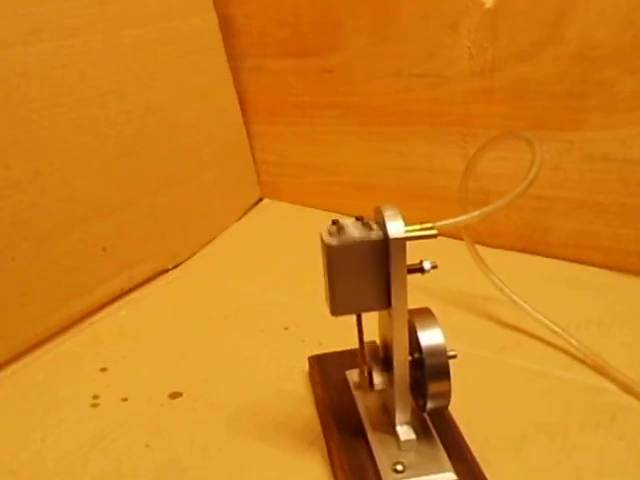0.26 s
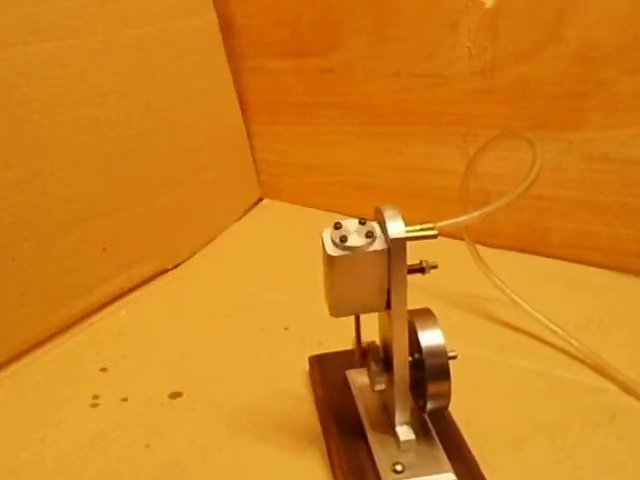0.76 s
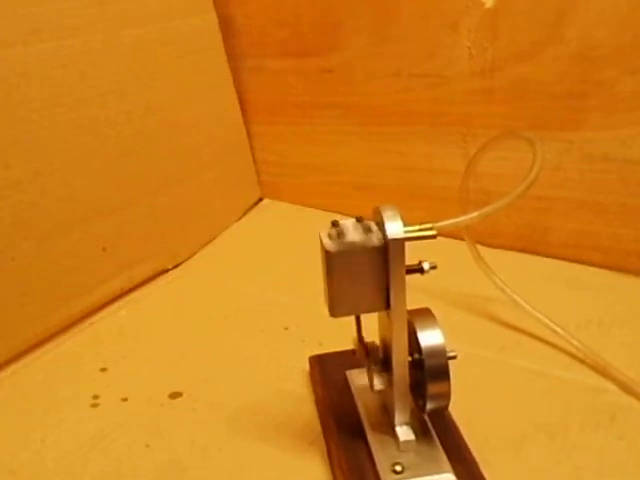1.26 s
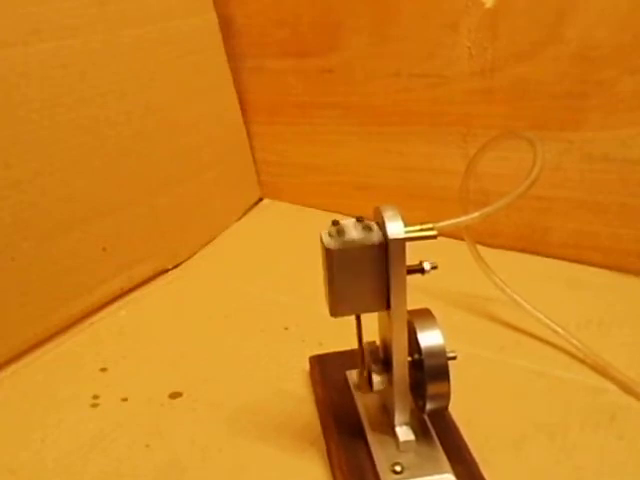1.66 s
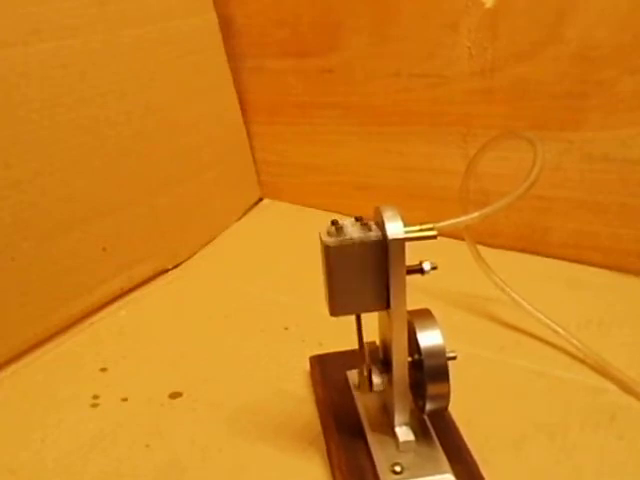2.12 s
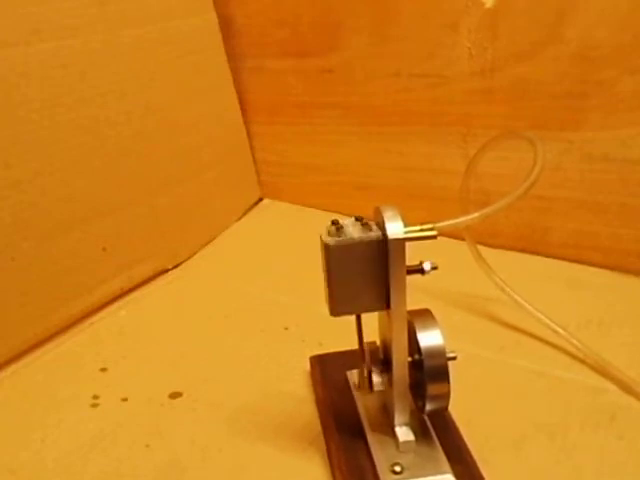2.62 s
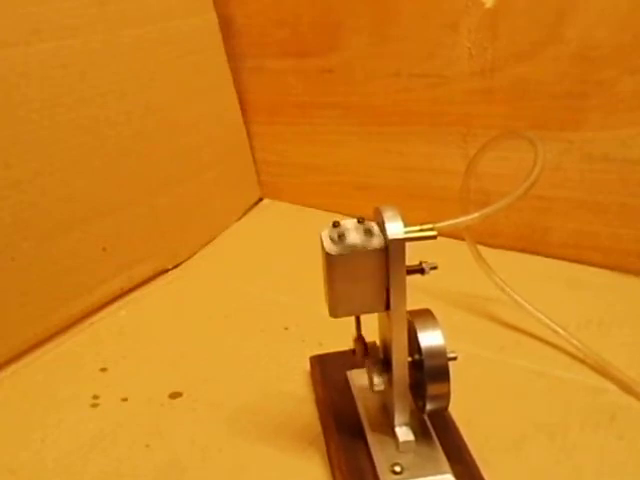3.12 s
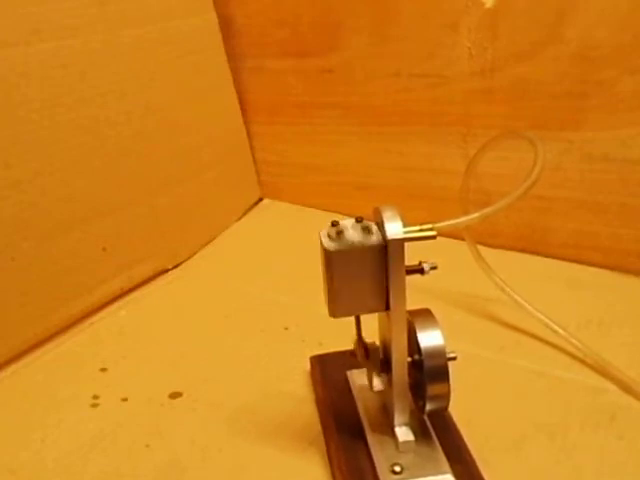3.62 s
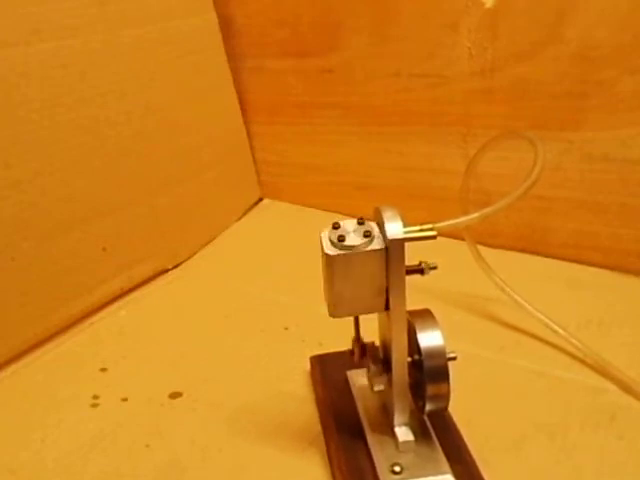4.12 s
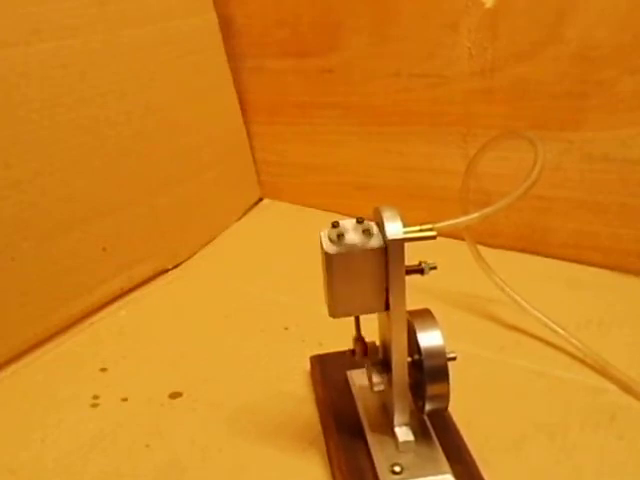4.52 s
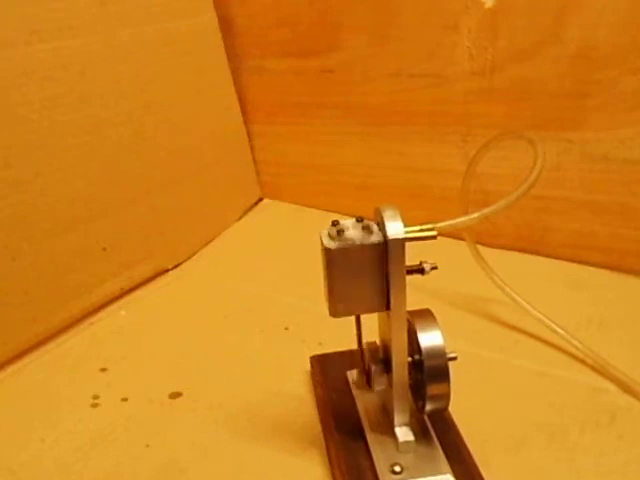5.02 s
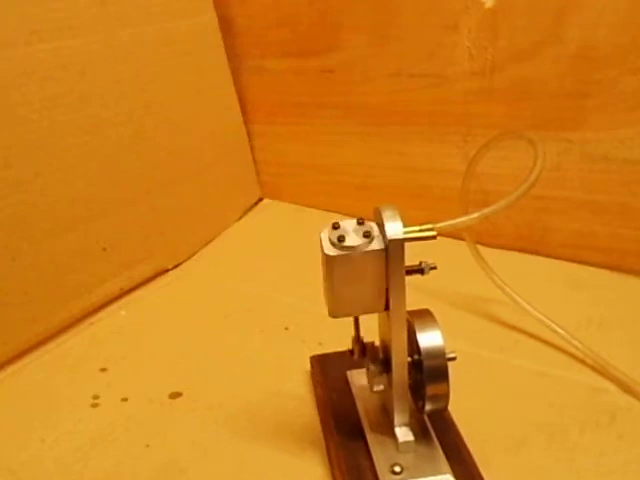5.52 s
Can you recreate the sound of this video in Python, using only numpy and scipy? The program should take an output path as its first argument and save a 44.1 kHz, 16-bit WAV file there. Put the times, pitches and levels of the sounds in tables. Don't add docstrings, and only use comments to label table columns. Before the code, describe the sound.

Rapid, dry metallic clatter mixed with sharp spitting air comes from a little engine in a cardboard corner. The beat is fast and slightly uneven at first, then gradually stretches from around 2.4 seconds and settles slower by about four, still running at the end. Snap, knock and exhaust hiss become easier to tell apart. A close microphone gives a crunchy, bright, distorted edge, with a faint rumble beneath and little room.

```python
import sys
import numpy as np
from scipy import signal
from scipy.fft import rfft, irfft
from scipy.io import wavfile
from scipy.ndimage import uniform_filter1d

SR = 44100
rng = np.random.default_rng(int(sys.argv[2]) if len(sys.argv) > 2 else 0)


def volts(x):
    e = np.asarray(x, float) / 20
    return 10 ** e


def output_pcm(signal):
    pcm = np.clip(np.atleast_2d(signal).T, -1, 1) * 32767
    wavfile.write(sys.argv[1], SR, np.round(pcm).astype(np.int16))


N = 254456

# hz, level_db (per Hz)
SCRAPE_HIGH = [(3000, -3), (4500, 7.5), (7000, -4)]
INLET_OPEN, EXHAUST_OPEN, EXHAUST_SHUT = 0.3, 0.62, 0.95


def turns():
    # snap_s, looseness_db,
    # return_after_ms, return_db, exhaust_after_ms
    turn_rows = [(-.0599, 2, 55, -23, 80.6), (0.051, -2, 55, -7, 84), (0.163, -9, 57, -8, 84),
                 (.2781, -6, 54, -12, 82), (0.3919, 7, 51, -10, 79), (0.505, -18, 48, -22, 82),
                 (0.627, -3, 54, -14, 80), (.739, -5, 56, -11, 82), (0.8548, -.5, 65, -6, 88),
                 (0.9735, -6, 55, -25, 87), (1.0892, -5, 64, -22, 85), (1.2127, -7, 54, -14, 80),
                 (1.3235, 1, 63, -11, 89), (1.444, -10, 60, -1.5, 83), (1.5633, -15, 49, -37, 79.6),
                 (1.682, -11, 55, -4, 83), (1.7996, -9, 60.4, -3.5, 85), (1.9195, 3, 58, -6, 84),
                 (2.0388, 4, 61, -6, 89.5), (2.1607, -8, 60.6, -6, 83), (2.2782, -3, 57, -3, 89),
                 (2.4074, 1, 60, -10, 95.5), (2.5395, -2, 67.5, -2, 94), (2.6684, 3, 72, -2, 93),
                     (2.802, 3, 80, -34, 105), (2.938, 5, 90, -6, 114), (3.0874, -5, 96, -8.5, 123),
                     (3.2484, -9, 101, -6.5, 120), (3.411, -10, 106, -6.5, 136),
                     (3.584, -5, 111.5, -1, 134), (3.7581, -2, 114, -3.5, 137), (3.938, -8, 116.4, -8, 147),
                     (4.1261, -1.5, 119.6, -6.5, 145), (4.311, -13, 128, -5, 146),
                     (4.506, -5, 123, -11, 145), (4.7028, -7, 125.4, -11, 147.4),
                     (4.9004, -3, 127, -7.5, 147), (5.1006, -9, 125.6, -7, 148),
                     (5.2981, -3, 123.6, -10, 151), (5.5006, 5, 130, -9, 150), (5.708, -17, 128, -18, 120),
                     (5.9178, 0, 128, -9, 149)]
    fast_s, slow_s = 0.095, 0.19
    all_turns = np.array(turn_rows)
    snap, loose_db, back_ms, back_db, exhaust_ms = np.transpose(all_turns)
    slow = np.clip((np.gradient(snap) - fast_s) / (slow_s - fast_s), 0, 1)
    return snap, snap + back_ms / 1000, snap + exhaust_ms / 1000, loose_db, back_db, slow


def crank():
    # fast_db, slow_db
    floors = [
        (-22.5, -32),
        (-23.5, -25),
        (-36.5, -24.5),
    ]
    # fast_db, slow_db, hold_ms, tail_ms
    after_snap = [
        (-11, -13.5, 6.3, 21.6),
        (-9, -23.5, 11.5, 18),
        (-11.5, -26.5, 11.6, 23),
    ]
    # fast_db, slow_db, hold_ms, tail_ms
    after_exhaust = [
        (-15.5, -25.5, 5.1, 8.2),
        (-17.5, -31.5, 30.7, 7.5),
        (-10.5, -32, 42.8, 4.6),
    ]
    opens_early_ms = 8.5
    shut_ms, shut_width_ms, shut_fast_db, shut_slow_db = 14, 3.3, -15, 0

    snap, _, exhaust, loose_db, _, slow = turns()
    t = np.arange(N) / SR
    turn, angle = np.divmod(np.interp(t, snap, np.arange(len(snap))), 1)
    turn = turn.astype(int)
    slow = np.interp(t, snap, slow)

    to_exhaust_ms = 1000 * (t - exhaust[turn])
    since_snap_ms = 1000 * (t - snap[turn])
    opens = exhaust - opens_early_ms / 1000
    last_open = np.maximum(np.searchsorted(opens, t) - 1, 0)
    since_exhaust_ms = 1000 * np.abs(t - opens[last_open])

    beds = []
    for floor, *swells in zip(floors, after_snap, after_exhaust):
        bed = volts(floor[0] + slow * (floor[1] - floor[0]))
        for (fast_db, slow_db, hold_ms, tail_ms), ms in zip(swells, (since_snap_ms, since_exhaust_ms)):
            decay = np.exp(-np.maximum(ms - hold_ms, 0) / tail_ms)
            bed = bed + volts(fast_db + slow * (slow_db - fast_db)) * decay
        beds.append(uniform_filter1d(bed, size=200))
    rattle, hiss, jet = beds

    shut_db = shut_fast_db + slow * (shut_slow_db - shut_fast_db)
    shut = volts(shut_db * np.exp(-((to_exhaust_ms + shut_ms) / shut_width_ms) ** 2))
    rattle = rattle * volts(0.41 * loose_db[turn] * np.sin(np.pi * angle) ** 2)
    return angle, rattle * shut ** 0.35, hiss * shut, jet * shut


def every_turn(times, slow, fast_row, slow_row):
    scatter_db, scatter_ms = 2.0, 0.6
    rows = np.array(fast_row) + np.outer(slow, np.subtract(slow_row, fast_row))
    chance = rng.standard_normal((len(times), 3))
    delay_ms = rows[:, 0] + scatter_ms * chance[:, 0] * (rows[:, 0] != 0)
    rows[:, 0] = times + delay_ms / 1000
    rows[:, 1] += scatter_db * chance[:, 1]
    rows[:, 2] *= volts(0.62 * chance[:, 2])
    return rows


def heard(rows):
    rows = np.vstack(rows)
    return rows[(rows[:, 0] > 0.008) & (rows[:, 0] < N / SR - 0.008)]


def knocks():
    # delay_ms, level_db, length_ms, mode_hz
    pin_knock = [(8, -6, 7.6, 2620), (13, -9, 9.6, 2600)]
    # delay_ms, level_db, length_ms, mode_hz
    blow_knock = [(11, -6.5, 7.2, 1440), (12, -30, 4.9, 1400)]
    # delay_ms, level_db, length_ms, mode_hz
    take_up = [(-10.5, -28, 1.4, 1400), (-12.5, -22.5, 1.6, 1430)]
    # start_s, level_db, length_ms, mode_hz
    strays = [(.2746, -13, 4.1, 1920), (0.1766, -5, 3.3, 1180), (.4935, -3.5, 5.2, 1100),
              (.616, -8, 3.9, 1810), (0.8516, -17, 7.7, 1770), (1.203, -14, 2.4, 1890),
              (1.532, -8, 13, 2270), (1.56, -12, 11, 1580), (1.9164, -13, 6, 1920), (1.992, -8, 7.7, 2230),
              (2.4824, -13, 1.8, 1140), (2.5317, -15, 3.9, 2220), (3.0672, -16, 2.5, 1130),
              (3.215, -7, 5.2, 3100), (3.976, -19, 15, 1250), (4.5271, -14, 2, 1930),
              (5.4337, -10, 2.6, 3030), (5.747, -10.5, 2.1, 3060)]
    return_ms, return_fast_hz, return_slow_hz = 4.6, 1410, 1860

    snap, back, exhaust, _, back_db, slow = turns()
    return_hz = return_fast_hz + slow * (return_slow_hz - return_fast_hz)
    returns = np.transpose([back, back_db, 0 * back + return_ms, return_hz])
    rows = heard([every_turn(snap, slow, *pin_knock), every_turn(exhaust, slow, *blow_knock),
                  every_turn(snap, slow, *take_up), returns, strays])
    rows[:, 3] *= volts(1.0 * rng.standard_normal(len(rows)))
    return rows


def frame(rattle, angle):
    # mode_hz, width_hz, level_db
    modes = [(1141.6, 61, -3.5), (1347, 232, -1), (1841, 184, 0), (2232, 100, -4), (3030, 110, -2),
             (3480, 1150, 1.5), (4493, 340, -1), (5470, 810, -4)]
    # hz, level_db (per Hz)
    scrape_low = [(300, -17), (900, -8.5), (1550, -4.5), (2700, -2)]
    slack_from_s = 4.4

    hz = np.array(modes)[:, 0]
    drive = np.tile(rattle * volts(-13.0) * flutter(34.5, depth_db=4.0), (len(hz), 1))
    drive[0] *= volts(0.5)
    rows = knocks()
    chance_db = 1.2 * rng.standard_normal((len(rows), len(hz)))
    for (s, db, ms, near_hz), own_db in zip(rows, chance_db):
        favour_db = 6 * np.exp(-(np.log(hz / near_hz) / 0.22) ** 2)
        returning = angle[round(s * SR)] > INLET_OPEN
        if returning:
            favour_db -= 7 * (hz > 2600)
        if returning and s > slack_from_s:
            add(drive, s - 0.007, 6.0, volts(db - 16 + favour_db + own_db), rise_ms=1.6, tail_ms=1.0)
        add(drive, s - 0.001, 0.65 * ms, volts(db - 11.0 + favour_db + own_db), rise_ms=0.47, tail_ms=3.24)

    contacts = [grains(8000, spread_db=2.5), grains(8000, spread_db=3.0)]
    rings = np.zeros(N)
    for k, (mode_hz, width_hz, db) in enumerate(modes):
        rings += volts(db) * resonate(drive[k] * contacts[k % 2], mode_hz, width_hz)
    rings += volts(-6.0) * drive[hz < 3400].mean(axis=0) * filtered_noise(scrape_low)
    grit = filtered_noise(SCRAPE_HIGH, grains(5000, spread_db=-3.0))
    return rings + volts(-2.3) * drive[hz > 3400].mean(axis=0) * grit


def bursts():
    # delay_ms, level_db, length_ms
    face_snap = [(0, -4, 6.6), (0, -5.5, 2)]
    # delay_ms, level_db, length_ms
    pin_snap = [(9, -14.5, 3.7), (12, -7, 4.2)]
    # delay_ms, level_db, length_ms
    rebound = [(32.3, -21, 2.7), (39.1, -5, 0.96)]
    # delay_ms, level_db, length_ms
    return_spit = [(0, -8.5, 5.6), (0, -28, 4.6)]
    # delay_ms, level_db, length_ms
    crack_open = [(-5, -34, 3.5), (-15.5, -15, 4.2)]
    # delay_ms, level_db, length_ms
    exhaust_puff = [(0, 0, 5.9), (0, -7, 13.7)]

    snap, back, exhaust, _, back_db, slow = turns()
    spit = every_turn(back, slow, *return_spit)
    spit[:, 1] += 0.41 * (back_db + 11)
    return heard([every_turn(snap, slow, *face_snap), every_turn(snap, slow, *pin_snap),
                  every_turn(snap, slow, *rebound), spit,
                  every_turn(exhaust, slow, *crack_open), every_turn(exhaust, slow, *exhaust_puff)])


def ports(angle):
    # mode_hz, width_hz, level_db
    cavities = [(5080, 220, -5.5), (7803, 125, -2), (8160, 154, -3.5), (8817, 440, 4), (9900, 1600, -6.5)]
    # hz, level_db (per Hz)
    jet_spectrum = [(1000, -13), (3000, -15), (6500, -8), (7800, -0.5), (11800, -4), (15900, -8)]

    jet, snap = np.zeros(N), np.zeros((len(cavities), N))
    rows = bursts()
    chance_db = 2.5 * rng.standard_normal((len(rows), len(cavities)))
    for (s, db, ms), own_db in zip(rows, chance_db):
        at = angle[round(s * SR)]
        inlet_flows = INLET_OPEN < at < EXHAUST_OPEN
        exhaust_flows = EXHAUST_OPEN < at < EXHAUST_SHUT and ms > 4.5
        if inlet_flows or exhaust_flows:
            add(jet, s - 0.002, 1.21 * ms, volts(db + 1.0), rise_ms=0.6 + 0.2 * ms, tail_ms=0.3 + 0.18 * ms)
        else:
            add(snap, s - 0.0005, 1.144 * ms, volts(db - 4.0 + own_db), rise_ms=0.53, tail_ms=0.33)

    spits = grains(9000, spread_db=1.0)
    rings = np.zeros(N)
    for k, (mode_hz, width_hz, db) in enumerate(cavities):
        rings += volts(db) * resonate(snap[k] * spits, mode_hz, width_hz) * (-1) ** k
    rings += volts(-5.0) * snap.mean(axis=0) * filtered_noise(SCRAPE_HIGH)
    return rings + jet * filtered_noise(jet_spectrum) * flutter(210, depth_db=1.5)


def leak(angle, hiss, jet):
    hz = np.interp(angle, [0.15, 0.4, 0.55, 0.68, 0.78], [8220, 9795, 10200, 9177, 7690])
    carrier = np.exp(2j * np.pi * np.cumsum(hz) / SR)
    r = np.exp(-np.pi * 280 / SR)
    wander = signal.lfilter([1], [1, -r], rng.standard_normal(N) + 1j * rng.standard_normal(N))
    whistle = rms_one((carrier * wander).real) * volts(-7) * flutter(28, depth_db=4.0)
    low = filtered_noise([(6800, -5.5), (8000, -3), (10000, -3)]) * volts(-4.0)
    high = filtered_noise([(10000, 5.5), (13000, 6.5), (15900, -0.5)]) * volts(-2.0)
    valve = rms_one(resonate(rng.standard_normal(N), 14455, 8)) * volts(-40.5)
    face = (low + whistle) * hiss * flutter(86, depth_db=2.0)
    return face + high * jet * flutter(41, depth_db=-0.5) + valve


def corner(x):
    ms = np.arange(SR // 10) * 1000 / SR
    echoes = rng.standard_normal(len(ms)) * volts(-60 * ms / 90) * (ms > 1.5)
    return signal.fftconvolve(x, echoes / np.sqrt(np.sum(echoes ** 2)))[:N]


def bench(rattle):
    # hz, level_db (per Hz)
    rumble = [(25, -4), (80, -1), (220, -1), (300, -9), (600, -6)]
    shaking = np.sqrt(uniform_filter1d(rattle, size=9000) * uniform_filter1d(rattle, size=900))
    return filtered_noise(rumble) * (volts(-66) + volts(-15.0) * shaking) * flutter(9.9, depth_db=-0.7)


def rms_one(x):
    return x / np.sqrt(np.mean(x ** 2) + 1e-20)


def filtered_noise(points, source=None):
    hz, db = np.transpose(points)
    f = np.maximum(np.arange(N // 2 + 1) * SR / N, 1)
    octaves_outside = np.maximum(np.log2(hz[0] / f), 0) + np.maximum(np.log2(f / hz[-1]), 0)
    shape = volts(np.interp(np.log(f), np.log(hz), db) - 24 * octaves_outside)
    if source is None:
        source = rng.standard_normal(N)
    return rms_one(irfft(rfft(source) * shape, N))


def grains(per_s, spread_db):
    sizes = volts(spread_db * np.minimum(rng.exponential(1, N), 4)) * rng.standard_normal(N)
    return rms_one(sizes * (rng.random(N) < per_s / SR))


def resonate(x, hz, width_hz):
    r = np.exp(-np.pi * width_hz / SR)
    b = np.sqrt((1 - r * r) / 2) * np.array([1, 0, -1])
    return signal.lfilter(b, [1, -2 * r * np.cos(2 * np.pi * hz / SR), r * r], x + 1e-18)


def flutter(per_s, depth_db):
    r = np.exp(-2 * np.pi * per_s / SR)
    return volts(depth_db * rms_one(signal.lfilter([1], [1, -2 * r, r * r], rng.standard_normal(N))))


def add(envelopes, s, length_ms, gains, rise_ms, tail_ms):
    start = round(s * SR)
    ms = np.arange(min(3000, N - start)) * 1000 / SR
    shape = np.clip((ms + 0.46) / rise_ms, 0, 1) * np.exp(-np.maximum(ms - length_ms, 0) / tail_ms)
    envelopes[..., start:start + len(ms)] += np.multiply.outer(gains, shape)


def scene():
    angle, rattle, hiss, jet = crank()
    engine = frame(rattle, angle) + ports(angle)
    return (engine + volts(-15.0) * corner(engine) + leak(angle, hiss, jet) + bench(rattle))[None]


def roll_off(x):
    return signal.sosfilt(signal.butter(12, 15850, fs=SR, output="sos"), x)


def record(dry):
    top = 0.73
    limited = top * np.tanh(volts(3.0) * dry / top)
    hz = np.arange(N // 2 + 1) * SR / N
    dips_db = -4 * np.exp(-((hz - 12530) / 110) ** 2) - 4 * np.exp(-((hz - 13800) / 250) ** 2)
    top_cut_db = np.maximum(hz - 15720, 0) / 6
    cut = irfft(rfft(limited) * volts(dips_db - top_cut_db), N)
    return roll_off(cut + 0.0043)


dry = scene()
out = record(dry)
output_pcm(out)
```